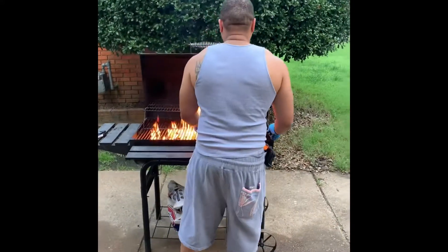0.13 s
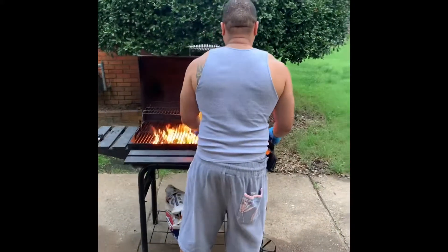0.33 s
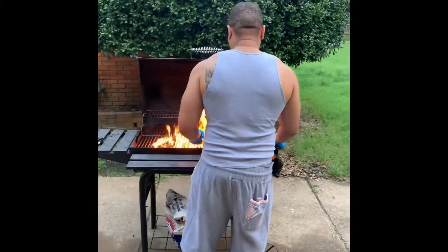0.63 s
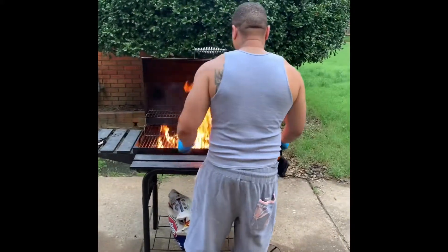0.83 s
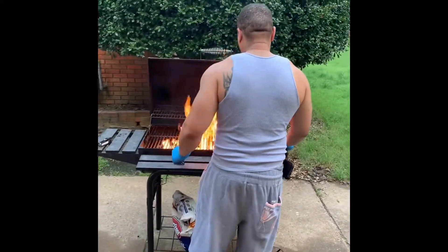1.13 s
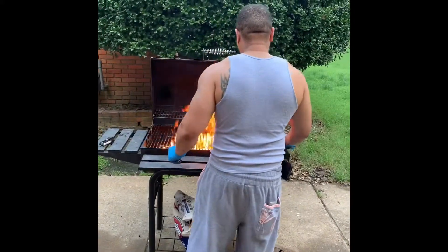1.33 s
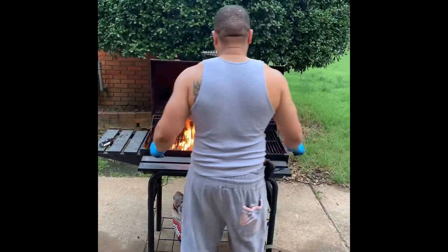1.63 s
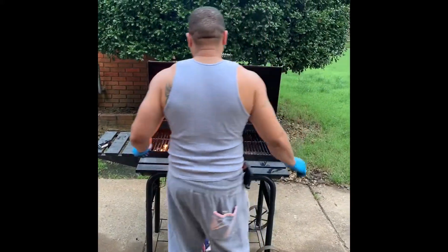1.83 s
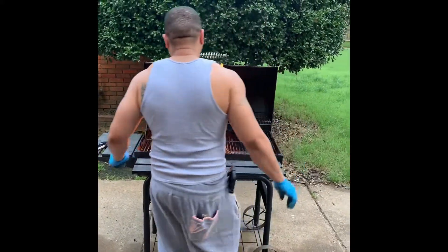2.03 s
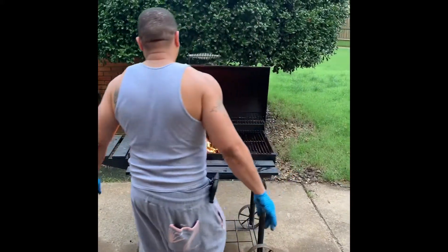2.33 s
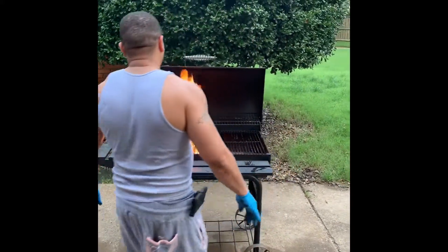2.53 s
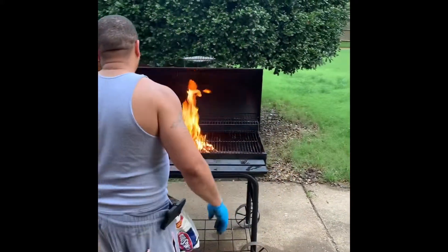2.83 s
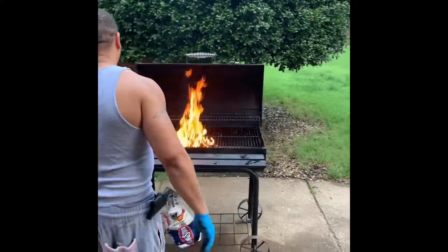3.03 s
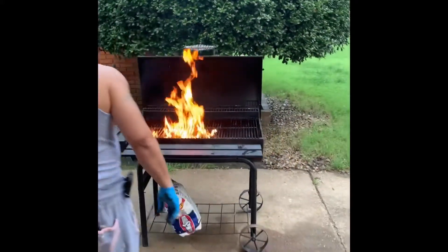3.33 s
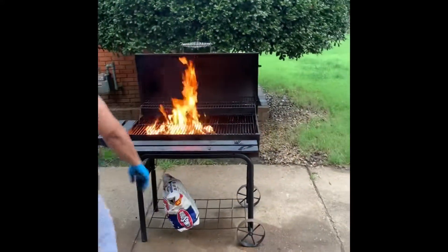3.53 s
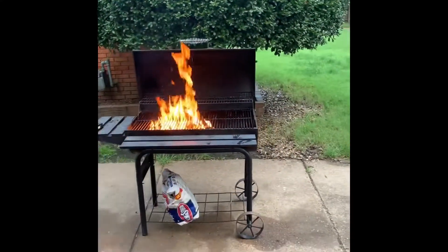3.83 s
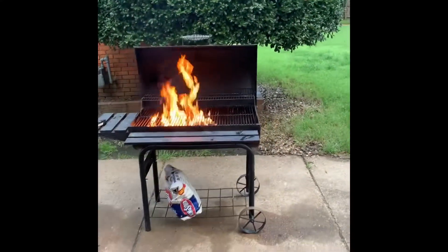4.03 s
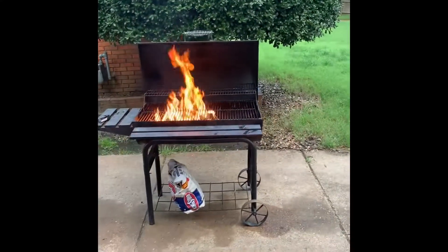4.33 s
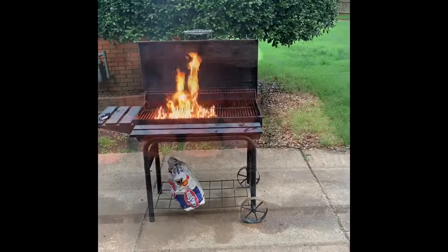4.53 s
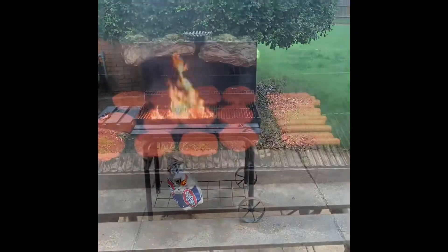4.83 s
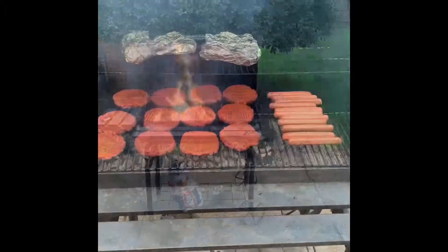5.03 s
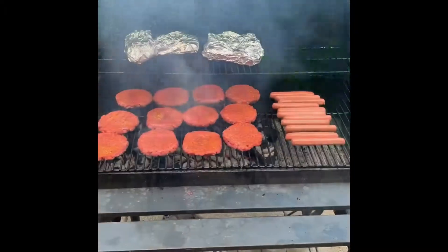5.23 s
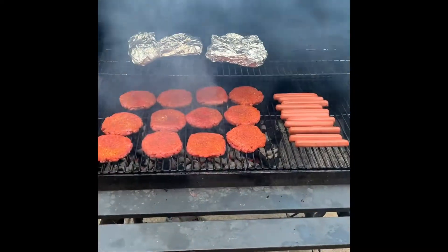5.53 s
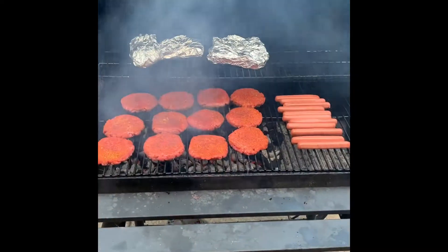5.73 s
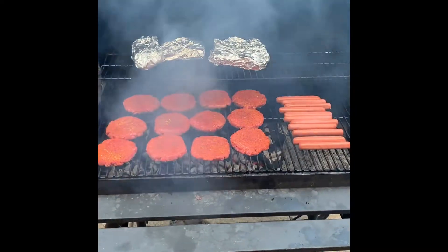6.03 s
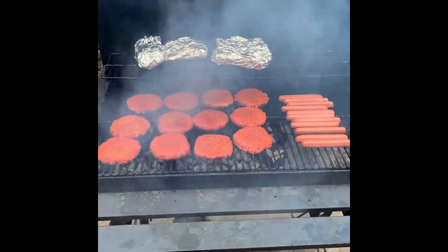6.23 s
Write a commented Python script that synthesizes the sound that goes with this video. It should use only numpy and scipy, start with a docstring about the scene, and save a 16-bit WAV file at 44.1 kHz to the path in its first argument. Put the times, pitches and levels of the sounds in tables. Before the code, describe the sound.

Charcoal burns high in a steel barrel grill in a backyard, with a low roar, an airy rush, fine hiss and scattered sharp pops. An early flare-up makes the barrel boom softly. Midway a machine starts humming nearby. The sound then blends to a position close over the grate, where fat sizzles and spits, the hum is loud and light puffs of wind touch the microphone.

```python
"""A low roar and an airy rush, with fine hiss and sharp pops: charcoal burns high in a steel barrel grill.
Turbulent flames radiate broadband noise, and a flare-up makes the barrel's cavity modes boom.
A machine starts to hum next door as a low rumble swells. A dissolve moves close to the grate, where fat
sizzles and spits, the hum is loud and puffs of wind touch the two microphone ports."""
import sys
import numpy as np
from scipy import signal
from scipy.fft import rfft, irfft, next_fast_len
from scipy.io import wavfile

SR = 44100
rng = np.random.default_rng(int(sys.argv[2]) if len(sys.argv) > 2 else 0)


def store_pcm(level_fs):
    """Save levels as 16-bit WAV."""
    pcm = np.round(np.clip(level_fs, -1, 1) * 32767).astype(np.int16)
    wavfile.write(sys.argv[1], SR, np.atleast_2d(pcm).T)


N = 281737
TIME = np.arange(N) / SR
FFT_SIZE = next_fast_len(N)
HZ = np.maximum(np.fft.rfftfreq(FFT_SIZE, 1 / SR), 1)
SHARED_ONLY = [[1], [0]]   # puts a tone wholly in the part common to both channels


def from_db(db):
    """Amplitude ratio of a level in decibels."""
    return 10 ** (np.asarray(db) / 20)


def unit_rms(x):
    """Normalisation to a mean power of 1."""
    return x / np.sqrt(np.mean(x ** 2) + 1e-20)


def in_time(rows):
    """Linear interpolation of timed rows: one curve for each column after the time."""
    seconds, *columns = np.transpose(rows)
    return [np.interp(TIME, seconds, column) for column in columns]


def at_hz(points):
    """Interpolation of a table along a logarithmic frequency axis."""
    hz, value = np.transpose(points)
    return np.interp(np.log(HZ), np.log(hz), value)


def swell(start_s, rise_s, hold_s, fall_s):
    """Trapezoidal envelope between 0 and 1."""
    return np.interp(TIME, np.cumsum([start_s, rise_s, hold_s, fall_s]), [0, 1, 1, 0])


def drift(corner_hz):
    """Slow random modulation of rms 1: coarse noise through two one-pole low-passes."""
    step, settle = 40, 2000
    pole = np.exp(-2 * np.pi * corner_hz * step / SR)
    coarse = rng.standard_normal(N // step + settle + 2)
    slow = signal.lfilter([1], [1, -2 * pole, pole * pole], coarse)[settle:]
    return np.interp(np.arange(N) / step, np.arange(len(slow)), unit_rms(slow))


def noise():
    """Two uncorrelated white noises."""
    return rng.standard_normal((2, N))


def coloured(x, spectrum):
    """Spectral shaping by a table, silent outside its range, scaled to rms 1."""
    inside = (HZ > spectrum[0][0]) & (HZ < spectrum[-1][0])
    shaped = rfft(x, FFT_SIZE) * from_db(at_hz(spectrum)) * inside
    return unit_rms(irfft(shaped, FFT_SIZE)[:, :N])


def resonance(x, hz, width_hz):
    """Damped resonator: a two-pole band-pass with a peak gain of 1."""
    radius = np.exp(-np.pi * width_hz / SR)
    feedback = [1, -2 * radius * np.cos(2 * np.pi * hz / SR), radius ** 2]
    return signal.lfilter(np.array([1, 0, -1]) * (1 - radius ** 2) / 2, feedback, x)


def bell(centre_s, sigma_s):
    """Gaussian envelope with a peak of 1."""
    return np.exp(-((TIME - centre_s) / sigma_s) ** 2 / 2)


def tone_pulses(rows):
    """Linear frequency sweeps under Gaussian envelopes, each at a random phase."""
    out = np.zeros(N)
    for centre_s, db, sigma_s, hz, glide_hz_per_s in rows:
        t = TIME - centre_s
        cycles = (hz + glide_hz_per_s * t / 2) * t + rng.random()
        out += from_db(db) * bell(centre_s, sigma_s) * np.sin(2 * np.pi * cycles)
    return out


def dissolve(far, close, out_s=(4.46, 5.58), in_s=(4.39, 5.22)):
    """Crossfade: the far sound falls linearly while the close one rises by a power law."""
    return np.interp(TIME, out_s, [1, 0]) * far + np.interp(TIME, in_s, [0, 1]) ** 2.07 * close


# Each row: frequency in Hz, how alike left and right sound from 0 to 1.
STEREO_LIKENESS = [(60, 1), (150, 1), (350, 0.94), (700, 0.54), (1400, 0.87), (2400, 0.53), (3000, 0.62),
                   (3700, 0.22), (5000, 0.98), (6000, 0.54), (7600, 0.95), (8800, .99), (10000, 0),
                   (11200, 1), (12300, 1), (13100, .96), (13900, .6), (14700, 0.65)]
# The right channel trails the left by a phase offset that grows in steps with frequency. Each row: frequency in
# Hz, phase offset of the right channel in half turns.
STEREO_PHASE = [(0, 0), (600, .15), (1000, -.08), (2000, .1), (2700, .85), (3400, .9), (3900, .55),
                (4700, .97), (5300, 1.03), (6500, 1.8), (7500, 2), (8900, 2), (11100, 3), (13100, 3),
                (14600, 4), (22050, 4)]


def stereo(parts, max_likeness=.998):
    """Sum and difference mixing: some bands sound centred, some wide; the right is shifted in phase."""
    common, opposed = rfft(parts, FFT_SIZE)
    likeness = np.clip(at_hz(STEREO_LIKENESS), 0, max_likeness)
    common = np.sqrt((1 + likeness) / 2) * common
    opposed = np.sqrt((1 - likeness) / 2) * opposed
    offset = np.exp(-1j * np.pi * np.interp(HZ, *np.transpose(STEREO_PHASE)))
    return irfft(np.array([common + opposed, (common - opposed) * offset]), FFT_SIZE)[:, :N]


# Close motor tones. Each row: frequency in Hz, relative level in dB, waver in dB, waver rate in Hz.
MOTOR_TONES = [(59.3, -15, 3.5, 5.6), (98, -5.5, 0.66, 12), (109, -17.5, 2, 4.8), (189.7, -25, 5, 9.1),
               (535.6, -27.5, 3, 11)]
# Thin whine above them. Each row: frequency in Hz, relative level in dB.
WHINE_TONES = [(2408.5, -33), (2467.5, -37)]


def machine_hum(far_hz=90.6, far_db=-42.5, close_db=-25.5):
    """Amplitude and phase modulation: steady motor tones waver as they cross moving air."""
    phase_per_hz = 2 * np.pi * TIME
    envelope = from_db(far_db) * swell(start_s=2.66, rise_s=0.39, hold_s=1.41, fall_s=0.23)
    far = envelope * from_db(1.5 * drift(4)) * np.sin(far_hz * phase_per_hz)
    close = np.zeros(N)
    for hz, db, waver_db, rate_hz in MOTOR_TONES:
        gain = from_db(db + waver_db * drift(rate_hz))
        close += gain * np.sin(hz * phase_per_hz + 0.24 * waver_db * drift(0.47 * rate_hz))
    for hz, db in WHINE_TONES:
        close += from_db(db + 1.5 * drift(12)) * np.sin(hz * phase_per_hz + .3 * drift(4))
    return np.sqrt(2) * dissolve(far, from_db(close_db) * close) * SHARED_ONLY


# Wind pressure. Each row: frequency in Hz, relative spectral density in dB.
WIND_SPECTRUM = [(20, -16), (50, -5), (100, 0), (200, -5), (300, -13), (450, -28)]
# Each row: centre in seconds, level at the centre in dB, Gaussian width in seconds.
WIND_PUFFS = [(4.7, -43.5, 0.1), (4.995, -43, 0.06), (5.136, -36.5, 0.02), (5.288, -43, 0.075),
              (5.55, -40.5, 0.063), (5.847, -40, .05), (5.98, -41.5, 0.022), (6.39, -44, 0.028)]


def wind(calm_db=-65.5):
    """Local pressure fluctuation: puffs of air give each port its own, uncorrelated rumble."""
    puffs = sum(from_db(db) * bell(centre_s, sigma_s) for centre_s, db, sigma_s in WIND_PUFFS)
    return (from_db(calm_db) + puffs) * from_db(0.97 * drift(6.8)) * coloured(noise(), WIND_SPECTRUM)


# Venting gas. Each row: frequency in Hz, relative spectral density in dB.
JET_SPECTRUM = [(2500, -21), (4000, 7), (8000, 2), (11000, -5), (15500, -17)]


def gas_jet(level_db=-54):
    """Jet noise: a pocket of gas vents from the coals in one breathy spurt."""
    envelope = swell(start_s=3.722, rise_s=0.008, hold_s=0.012, fall_s=0.05)
    return from_db(level_db) * envelope * coloured(noise(), JET_SPECTRUM)


# Far hiss, close hiss and their top octave. Each row: frequency in Hz, relative spectral density in dB.
FAR_HISS_SPECTRUM = [(1500, -25), (3500, 9), (5000, 6), (7000, 2), (8000, 4.5), (9000, -1), (10500, -9.5),
                     (12500, -19), (15700, -6)]
CLOSE_HISS_SPECTRUM = [(1500, 7), (3000, 4.5), (5000, 3), (7000, 2), (8800, 1), (10500, -4), (12500, -10),
                       (15700, -17)]
TOP_HISS_SPECTRUM = [(9000, -9), (11000, -9.5), (13000, -4), (14500, -6), (15200, -2), (15680, 4),
                     (15800, -25)]
# Each row: time in seconds, level of the top octave against the hiss in dB.
TOP_HISS_LEVELS = [(0, -9), (1.4, -7), (1.8, -29), (2.3, -13), (2.9, -9), (4.5, -7), (5.15, -21),
                   (5.42, -8), (5.7, -12), (6.39, -16)]
# Fat on the grate. Each row: time in seconds, level in dB before the dissolve.
SIZZLE_LEVELS = [(4.5, -42), (5.0, -51.5), (5.2, -53.5), (5.35, -52.5), (5.5, -50.5), (5.62, -51.5),
                 (5.75, -52.5), (6.05, -53.5), (6.39, -52)]


def sizzle(far_db=-60, ticks_per_s=150, spread_db=6.0, tick_db=-22, tick_decay_s=0.00069):
    """Shot-noise modulation: tiny random ticks briefly lift the hiss of gas and fat."""
    sizes = from_db(spread_db * np.minimum(rng.exponential(1, N), 5))
    ticks = sizes * (rng.random(N) < ticks_per_s * from_db(5 * drift(4)) / SR)
    decaying_ticks = signal.lfilter([1], [1, -np.exp(-1 / (tick_decay_s * SR))], ticks)
    flicker = (1 + from_db(tick_db) * decaying_ticks) * from_db(drift(19))
    top_gain = from_db(in_time(TOP_HISS_LEVELS)[0])
    far, close = flicker * noise(), flicker * noise()
    far = coloured(far, FAR_HISS_SPECTRUM) + top_gain * coloured(far, TOP_HISS_SPECTRUM)
    close = coloured(close, CLOSE_HISS_SPECTRUM) + top_gain * coloured(close, TOP_HISS_SPECTRUM)
    return dissolve(from_db(far_db) * far, from_db(in_time(SIZZLE_LEVELS)[0]) * close)


# The crack, edge, body and top bands of a pop. Each row: lower and upper limit in Hz.
POP_BANDS = [(7000, 10300), (4600, 7000), (2300, 4600), (10300, 15500)]
# Each row: start in seconds, gain in dB, edge, body and top gains against the crack band in dB,
# time to decay by 60 dB in seconds.
POP_EVENTS = [(0.2027, -40, -3, -4, 1, 0.031), (0.303, -42, 1, -5, 4, 0.038),
              (0.558, -50, -2, -12, 1, .025), (0.7345, -43, -8, -14, 5, .02),
              (0.7363, -36.5, -1, -4, -1, 0.03), (0.82, -39, -7, -18, -4, .014),
              (1.225, -45, -8, -15, -3, .06), (1.328, -46, 0, -1, 0, 0.039),
              (2.453, -49, -3, -8, -4, 0.084), (3.047, -53, -5, -5, 1, .035), (3.58, -49, -8, -10, -8, .03),
              (3.633, -48, 2, -9, -4, .035), (4.023, -51, -10, -8, -1, .04),
              (4.672, -51.5, -3.5, -3.5, -2, .05), (4.939, -39, -4, -14, -3, 0.044),
              (5.15, -46, -2, -8, -11, .02), (5.2377, -37, -3, -9, -11, 0.023),
              (5.243, -41, -8, -1, -13, 0.02), (5.258, -48, -7, -8, -10, .03), (5.32, -43, 0, 0, -10, .04),
              (5.364, -46, -2, -10, -12, .04), (5.468, -37, 3, -12, -12, 0.022),
              (5.6825, -27.5, -9, -5, -7, .012), (5.686, -29, -6, -9, 3, 0.027),
              (5.696, -37, 1, -8, -4, .018), (5.839, -33, -2, -4, -19, 0.013),
              (5.859, -34.5, 6, 6.5, 1, .018), (5.8626, -36, 2, -2, 1, 0.038),
              (6.256, -35.5, -7, -6, -1, .045), (6.299, -44, -3, -10, -11, .035)]
# Each row: centre in seconds, peak in dB, Gaussian width in seconds, pitch in Hz, glide in Hz per second.
SQUEAKS = [(1.0428, -42, .0007, 4100, -200000), (1.0472, -35, .002, 3000, -400000)]


def pops(tail_db=-20, tail_t60_s=.05, snap_db=5, ragged_db=3, grain_samples=24):
    """Impulsive transients: coals and fat snap, then sputter in exponential decay; two squeaks fall."""
    out = np.zeros((2, N + SR))
    t = np.arange(SR // 10) / SR
    bands = [signal.butter(6, limits, "band", fs=SR, output="sos") for limits in POP_BANDS]
    for start_s, gain_db, edge_db, body_db, top_db, t60_s in POP_EVENTS:
        decay = from_db(-60 * t / t60_s) + from_db(tail_db - 60 * t / tail_t60_s)
        grains = from_db(ragged_db * rng.standard_normal(len(t) // grain_samples + 1))
        ragged = unit_rms(grains.repeat(grain_samples)[:len(t)])
        ragged[:grain_samples] = 1   # keeps the attack firm
        burst = decay * ragged * rng.standard_normal((2, len(t)))
        burst[:, 0] = from_db(snap_db)
        band_gains = from_db([0, edge_db, body_db, top_db])
        pop = sum(gain * signal.sosfilt(band, burst) for gain, band in zip(band_gains, bands))
        start = round(start_s * SR)
        out[:, start:start + len(t)] += from_db(gain_db) * pop
    return out[:, :N] + tone_pulses(SQUEAKS) * SHARED_ONLY


# Each row: frequency in Hz, bandwidth of each of two resonator stages in Hz, relative level in dB.
LOW_MODES = [(123.7, 19, -0.5), (231.3, 36, 4), (301, 75, -2)]
# Low rumbling swells with a thin tone; the second comes as the machine starts.
# Each row: start and length in seconds, rumble in dB, thin tone in dB, extra gain of the top mode in dB.
RUMBLE_SWELLS = [(0.43, 0.435, -40.5, -56.5, 0), (2.62, 1.15, -47.5, -59, -13)]
# Puffs of flame that lock onto a low mode. Each row: centre in seconds, peak in dB,
# Gaussian width in seconds, pitch in Hz, glide in Hz per second.
BARREL_BOOMS = [(0.49, -38, 0.015, 257, -300), (0.599, -25, 0.014, 236, 900),
                (0.676, -23, 0.0082, 233.3, 300), (0.685, -31.5, 0.016, 124, 100),
                (0.76, -34, 0.027, 234, 100), (0.77, -33, 0.026, 123, 150)]


def rumble_and_booms(idle_db=-51.5, ramp_share=0.12, tone_hz=532):
    """Resonance: a hollow rumble swells twice with a thin tone; puffs of flame make the barrel boom."""
    drive = noise()
    *low_modes, top = [from_db(db) * unit_rms(resonance(resonance(drive, hz, width), hz, width))
                       for hz, width, db in LOW_MODES]
    low = sum(low_modes)
    modes_rms = np.sqrt(np.mean((low + top) ** 2))
    rumble = from_db(idle_db) * (low + top)
    tone_gain = np.zeros(N)
    for start_s, length_s, rumble_db, tone_db, top_db in RUMBLE_SWELLS:
        ramp_s = ramp_share * length_s
        envelope = swell(start_s, ramp_s, length_s - 2 * ramp_s, ramp_s)
        rumble += from_db(rumble_db) * envelope * (low + from_db(top_db) * top)
        tone_gain += from_db(tone_db) * envelope
    booms = tone_pulses(BARREL_BOOMS)
    tone_gain *= from_db(4 * drift(6.6))
    tone = tone_gain * np.sqrt(2) * np.sin(2 * np.pi * tone_hz * TIME + 1.1 * drift(4.7))
    return rumble / modes_rms + (booms + tone) * SHARED_ONLY


# Bands of flame noise. Each row: frequency in Hz, relative spectral density in dB.
FAR_ROAR_SPECTRUM = [(11, -39), (18, -11), (65, 0.5), (95, -4.5), (120, -4.5), (158, -8), (205, -9.5),
                     (239, -10.5), (339, -16.5), (454, -27.5), (500, -18.5), (650, -42.5), (1100, -120)]
CLOSE_ROAR_SPECTRUM = [(18, -30), (30, -10.5), (57, 6), (80, -5), (110, -6), (150, -11), (195, -10.5),
                       (260, -19), (340, -22.5), (500, -31.5)]
FAR_RUSH_SPECTRUM = [(600, -34), (800, -0.5), (900, 2.5), (990, 2.5), (1100, 1), (1250, -5), (1400, -10.5),
                     (2200, -14.5)]
CLOSE_RUSH_SPECTRUM = [(250, -23), (400, 0), (560, 5), (800, 3.5), (1100, 0.5), (1400, -1), (2200, -67)]
LOWER_RUSH_SPECTRUM = [(250, -38), (330, -5.5), (420, -6.5), (600, -3.5), (780, -1), (900, -7.5),
                       (1100, -27)]
UPPER_RUSH_SPECTRUM = [(800, -15), (1250, -1), (1750, -1.5), (2100, -8), (2700, -11), (3600, -22.5),
                       (5000, -34)]
# Each row: time in seconds, rush level in dB, lower and upper rush against it in dB, roar level in dB.
FAR_FLAME_LEVELS = [(0, -45, -1, -1, -37.5), (.4, -46, -2.5, -1.5, -36.5), (.6, -45, -3, -2, -37),
                    (.9, -45, -4.5, 0.5, -36.5), (1.2, -46.5, -3, 2.5, -36), (1.6, -44, -2, -0.5, -35.5),
                    (2, -46, -2, 2, -37), (2.3, -43, -3, 0, -36.5), (2.6, -49, -0.5, 4.5, -38.5),
                    (3.1, -47, 0.5, -1, -38.5), (3.5, -47.5, -3, -0.5, -38), (3.8, -45, -6.5, -0.5, -38),
                    (4.1, -46.5, -3, 0.5, -37), (4.36, -45.5, -5.5, -0.5, -38.5),
                    (4.5, -49.5, -4, 1.5, -40)]
# Each row: time in seconds, rush level in dB before the dissolve.
CLOSE_FLAME_LEVELS = [(4.9, -42.5), (5.2, -45), (5.5, -44.5), (5.75, -44.5), (6.0, -42), (6.39, -43.5)]
# Each row: time in seconds, gain of the roar's deepest part in dB.
DEEP_ROAR_GAINS = [(0, 5), (.5, -0.5), (.8, -3.5), (1.2, -1), (1.6, 2.5), (2.1, -0.5), (2.5, 6.5),
                   (2.9, 5.5), (3.3, 2), (3.7, 1), (4.3, -6), (4.7, 3), (4.95, -2), (5.15, 3.5), (5.5, -14),
                   (5.85, -4.5), (6.39, -9)]


def flames(deep_hz=62, close_roar_boost_db=14, close_upper_boost_db=-5):
    """Turbulent combustion: unsteady burning radiates a low roar under a gently fluttering rush."""
    rush_db, lower_db, upper_db, roar_db = in_time(FAR_FLAME_LEVELS)
    far_gain = from_db(rush_db)
    close_gain = from_db(in_time(CLOSE_FLAME_LEVELS)[0])

    far_roar = from_db(roar_db) * coloured(noise(), FAR_ROAR_SPECTRUM)
    close_roar = close_gain * from_db(close_roar_boost_db) * coloured(noise(), CLOSE_ROAR_SPECTRUM)
    roar = dissolve(far_roar, close_roar)
    deep = signal.sosfiltfilt(signal.butter(3, deep_hz, fs=SR, output="sos"), roar)
    roar = roar - deep + from_db(in_time(DEEP_ROAR_GAINS)[0]) * deep

    far_rush = coloured(noise(), FAR_RUSH_SPECTRUM)
    far_rush += from_db(lower_db + 1.04 * drift(6.2)) * coloured(noise(), LOWER_RUSH_SPECTRUM)
    rush = dissolve(far_gain * far_rush, close_gain * coloured(noise(), CLOSE_RUSH_SPECTRUM))

    far_upper = far_gain * from_db(upper_db) * coloured(noise(), UPPER_RUSH_SPECTRUM)
    close_upper = close_gain * from_db(close_upper_boost_db) * coloured(noise(), UPPER_RUSH_SPECTRUM)
    upper = dissolve(far_upper, close_upper)
    return roar + from_db(1.56 * drift(11.8)) * rush + from_db(1.36 * drift(23)) * upper


def scene():
    """Superposition in stereo; pops come from all over the coals, so they sound a little wider."""
    steady = stereo(flames() + sizzle() + gas_jet() + rumble_and_booms() + machine_hum())
    return steady + stereo(pops(), max_likeness=.96) + wind()


def record(dry, stop_hz=16850):
    """Band limiting: a steep low-pass removes the highest treble."""
    return signal.sosfilt(signal.cheby2(24, 70, stop_hz, fs=SR, output="sos"), dry)


dry = scene()
out = record(dry)
store_pcm(out)
```